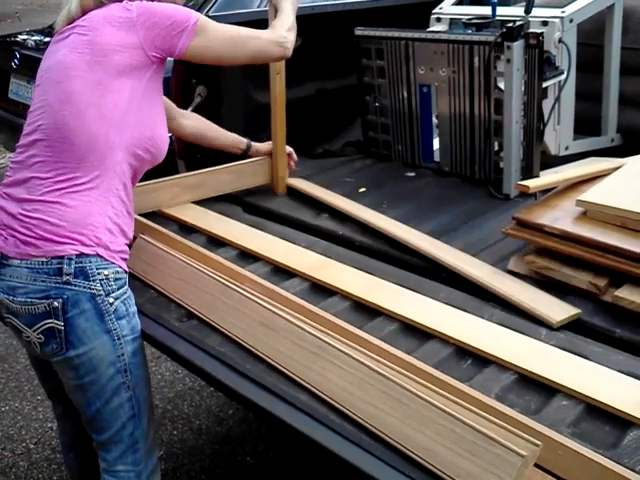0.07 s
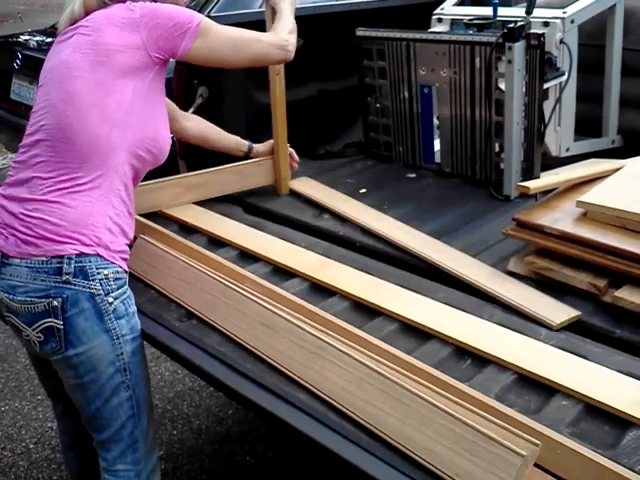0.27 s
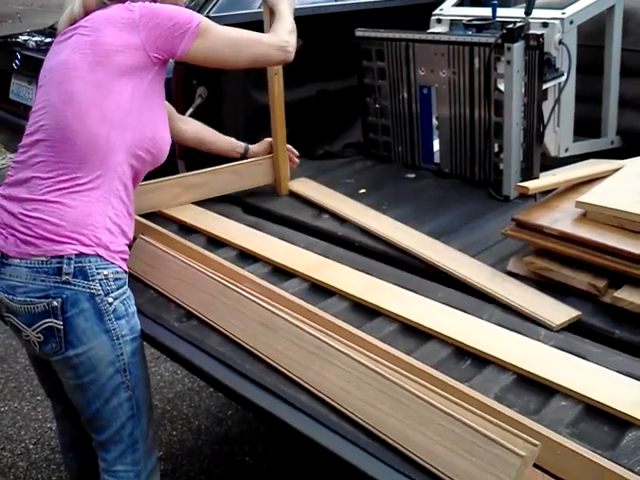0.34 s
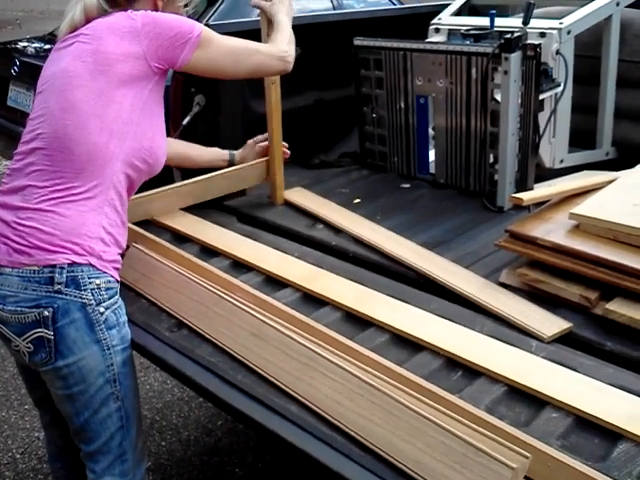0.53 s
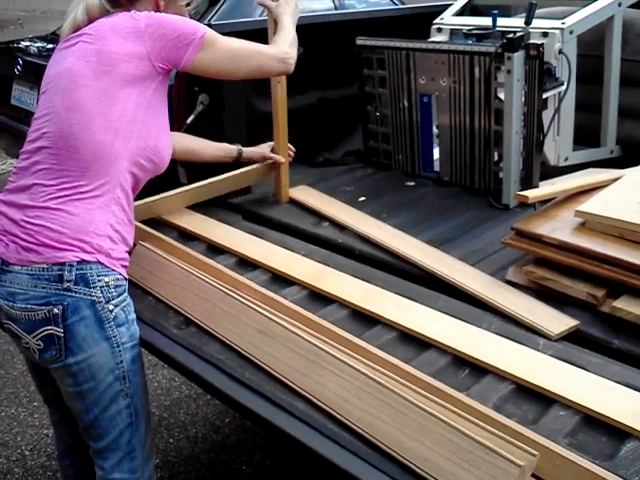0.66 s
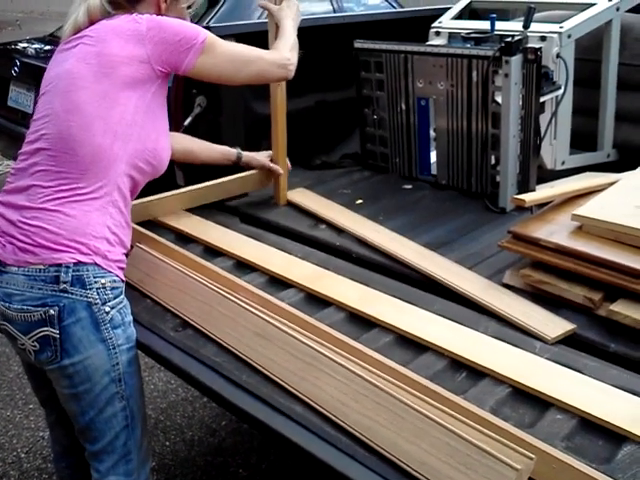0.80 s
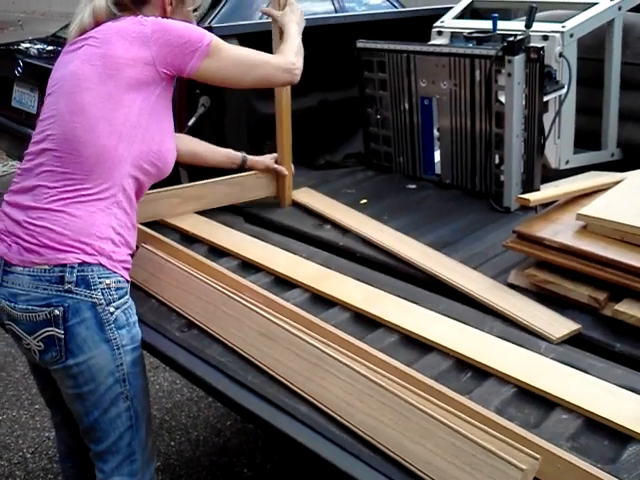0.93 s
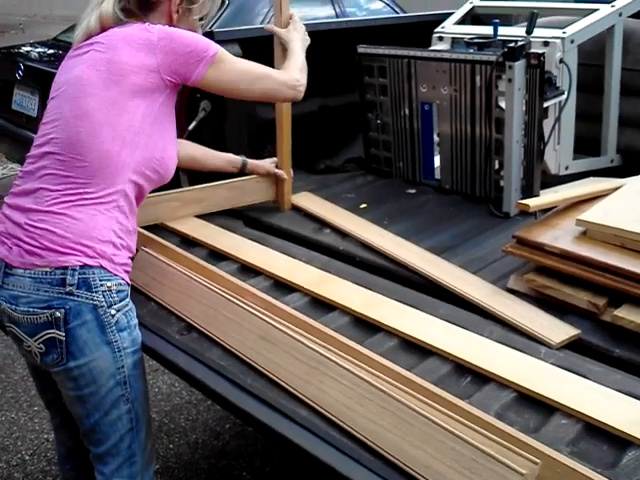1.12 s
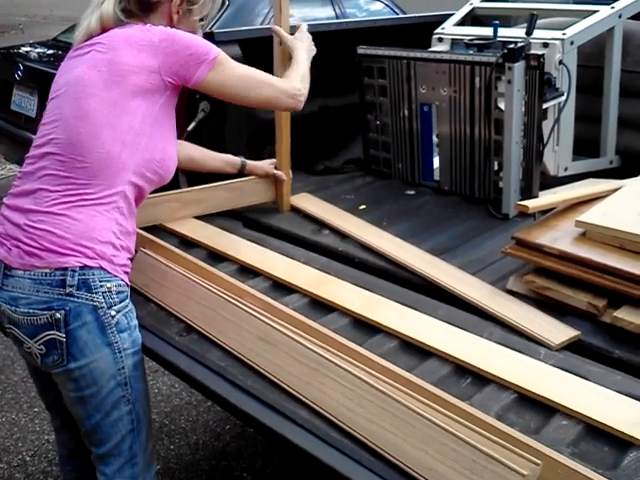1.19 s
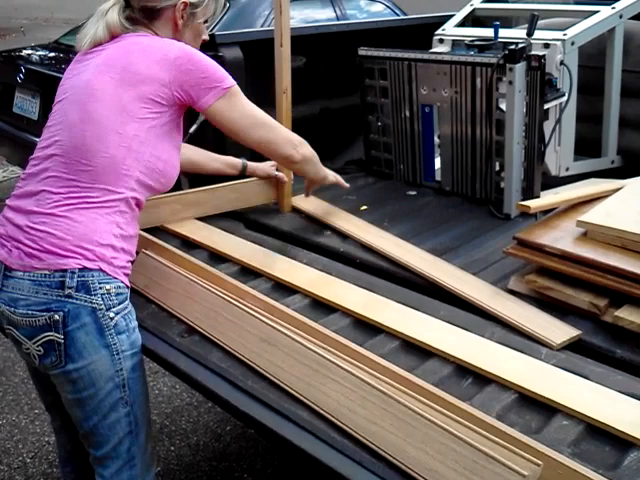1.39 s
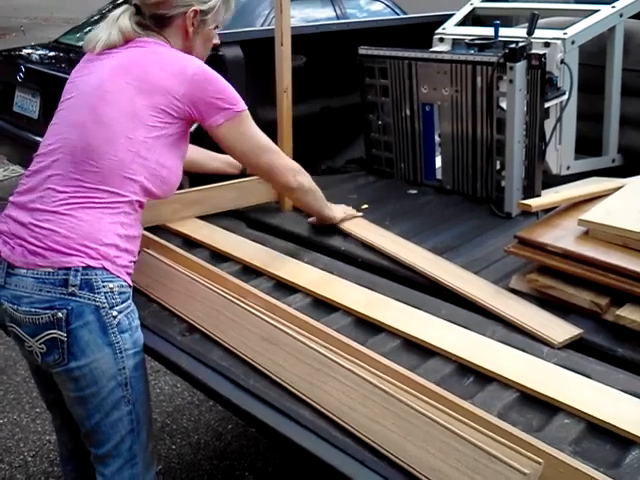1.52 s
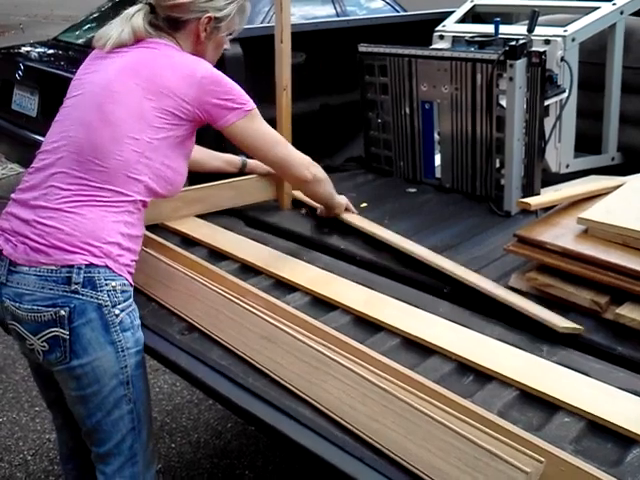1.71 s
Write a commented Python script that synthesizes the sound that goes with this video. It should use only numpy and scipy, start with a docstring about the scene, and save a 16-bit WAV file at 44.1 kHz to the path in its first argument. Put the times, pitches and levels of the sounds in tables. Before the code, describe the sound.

A wooden board falls with a loud, slightly distorted slap and rapid bouncing clatter in a hollow pickup bed, after soft bumps and scraping; lighter knocks follow, over faint outdoor rumble, close dull microphone.

```python
"""In a pickup bed outdoors, a wooden board tips over, slaps down and bounces, with lighter knocks and slides.
Each blow is a crack, the ringing of board and bed, and a faint rattle of further touches.
Ringing is made of decaying sine tones, with bands of decaying noise between them.
Sliding wood is coloured noise of uneven size; a few thin tones linger in the bed.
Distant outdoor noise lies underneath, and the loud slaps overload the input stage."""
import sys
import numpy as np
from scipy import signal
from scipy.fft import rfft, irfft
from scipy.io import wavfile
from scipy.ndimage import uniform_filter1d

SR = 44100
rng = np.random.default_rng(int(sys.argv[2]) if len(sys.argv) > 2 else 0)


def elevation(decibels):
    """Turn decibel levels (scalar or array-like) into linear amplitude ratios."""
    levels = np.asarray(decibels, float)
    return 10 ** (levels / 20)


def store_pcm(level_fs):
    """Save levels as 16-bit WAV."""
    pcm = np.round(np.clip(level_fs, -1, 1) * 32767).astype(np.int16)
    wavfile.write(sys.argv[1], SR, np.atleast_2d(pcm).T)


N = 77175  # length of the scene in samples

# In all the tables, t60 is the time a ring takes to fall by 60 dB.
# Distant outdoor noise, its balance of low and high: (frequency [Hz], relative level [dB per Hz])
OUTDOOR_COLOUR = [(12, -15), (20, -19.5), (48, -1.5), (108, -4), (149, -15.5), (248, -7), (324, -10),
                  (1140, -13), (2610, -31), (7410, -39), (12000, -103), (15600, -118), (22000, -120)]
# Loudness of the wood sliding on the bed: (time [s], level [dB])
SLIDE_LEVELS = [(0, -49), (.09, -45.5), (.17, -45), (.25, -44), (0.601, -66.5), (0.722, -45), (.9, -47),
                (.96, -49), (1.02, -42.5), (1.064, -29.5), (1.119, -44), (1.2, -51.5), (1.3, -57.5),
                (1.593, -60), (1.61, -47.5), (1.72, -49.5), (1.75, -57)]
# Sliding wood, its balance of low and high: (frequency [Hz], relative level [dB per Hz])
SLIDE_COLOUR = [(710, -21), (1200, 3.5), (4620, 0.5), (6050, -7), (7700, -8), (8650, -31.5), (9520, -63),
                (12000, -40), (15600, -103), (22000, -120)]
# Blows, with the pitches that the struck spot favours:
# (time [s], board level [dB], bed level [dB], board favoured pitch [Hz], bed favoured pitch [Hz])
BLOWS = [(.002, -41, -19.5, 1500, 200), (0.0293, -30, -24, 3000, 305), (0.0414, -30, -23.5, 735, 530),
         (.064, -36, -19.5, 1200, 282), (0.0956, -36, -27, 3000, 218), (0.113, -36, -32.5, 2600, 200),
         (0.126, -31, -22.5, 2400, 200), (0.157, -29.5, -21, 2500, 208), (0.185, -34, -44, 2600, 200),
         (0.2066, -23.5, -34, 2300, 402), (.2179, -16.5, -48, 2700, 400), (.229, -49, -36, 2200, 390),
         (0.232, -33, -25, 1200, 592), (0.253, 0.5, -6.5, 2300, 600), (0.272, -1.5, -4, 1800, 260),
         (.3032, -3, -14.5, 2200, 500), (0.3424, -4.5, -5.5, 2340, 647), (.356, -10, -15, 1400, 500),
         (0.4145, -13.5, -13, 2600, 500), (0.4225, -9, -10.5, 1750, 322), (0.4675, -14, -12.5, 2800, 500),
         (.4725, -13, -9, 1750, 450), (0.5018, -11.5, -13.5, 2800, 404), (.528, -18, -14, 2040, 500),
         (.551, -19.5, -15, 2500, 390), (0.563, -19, -21, 1750, 500), (0.7508, -31.5, -26.5, 800, 200),
         (0.7809, -24, -24, 1300, 500), (.787, -29.5, -22, 1100, 620), (0.795, -18.5, -26.5, 1200, 250),
         (0.81, -44, -27, 900, 407), (0.831, -28, -28, 1540, 600), (0.8366, -30, -27.5, 800, 250),
         (1.0629, -16.5, -26, 1530, 700), (1.066, -23, -36, 680, 680), (1.073, -24, -36, 700, 600),
         (1.098, -24, -28.5, 1700, 224), (1.135, -33, -28, 1030, 200), (1.239, -50, -37, 2500, 400),
         (1.651, -65, -39, 1000, 500), (1.662, -67, -33.5, 1010, 235)]
# Ringing tones of the board, before the cap and the shortening below:
# (frequency [Hz], relative level [dB], t60 [s])
BOARD_MODES = [(675.3, 4, 0.11), (853, -2.5, 0.11), (1079, -1.5, 0.1), (1173.4, -6.5, 0.11),
               (1277, -4, 0.082), (1403, -6, .13), (1620, 2, 0.042), (1732, 1.5, 0.1), (1981, -7.5, 0.15),
               (2097, -6, 0.084), (2292, 1.5, 0.033), (2579, -6, 0.067), (2747, -1.5, 0.033),
               (2994, -13, 0.047), (3256, -8, 0.038), (3560, -8, 0.096), (3720, -11.5, 0.06),
               (3950, -11, 0.11), (5170, -44.5, 0.023), (5560, -31, 0.025)]
# Ringing tones of the bed, before light knocks shorten them: (frequency [Hz], relative level [dB], t60 [s])
BED_MODES = [(139.4, -6.5, 0.31), (179.6, -4.5, 0.29), (236.2, 0.5, 0.13), (265, -3, 0.19),
             (365.6, -5.5, 0.13), (434, -18.5, 0.33), (496, -19.5, 0.27), (530, -5.5, 0.13),
             (551.3, -8, .2), (583.2, -6, 0.25), (779.7, -0.5, 0.095), (939, -4, 0.057),
             (1172.5, 2.5, 0.057)]
# Dense ring of the board between its tones, before light knocks shorten it:
# (band centre [Hz], relative level [dB], t60 [s])
BOARD_DENSE = [(1000, -15, .2), (1500, -17, .17), (2200, -17, .16), (3200, -16, .15), (4500, -17, .13),
               (6400, -18, .12)]
# Dense ring of the bed's panels, before light knocks shorten it:
# (band centre [Hz], relative level [dB], t60 [s])
BED_DENSE = [(44.7, -26, .3), (71, -9.5, 0.27), (130, -11, 0.26), (200, -13, 0.87), (299, -6.5, 0.23),
             (500, -5.5, 0.29), (744, -7, 0.3), (1100, -10.5, 0.45)]
# Thin tones that linger in the bed: (start [s], frequency [Hz], level [dB], t60 [s], rise [cycles])
LINGER_TONES = [(.09, 220, -25, .6, 10.), (1.12, 540, -42, 1.8, 40.), (1.10, 258, -44, 1.5, 15.),
                (1.085, 200, -31, .45, 8.)]

OUTDOORS_DB = -42
# How far the levels wander [dB], before walk() smooths them
SWELL_WALK_DB, GRIT_WALK_DB, WAVER_WALK_DB = 1.2, 1.5, 2.5
PITCH_WAVER = 0.008  # share of the pitch, also before smoothing
GRIT_SIZE_DB = 2.0  # average extra size of a grain
CRACK_HZ, CRACK_OCTAVES, CRACK_T60_S = 3200, 0.7, 0.02
# Lighter touches just after a blow: how many, the loudest possible at first, and the fade to 37 percent
RATTLE_PER_S, RATTLE_DB, RATTLE_FADE_S = 400, -14, 0.004
# Each blow rings its tones at slightly different strengths and pitches (typical spread)
SCATTER_DB, DETUNE_SHARE = 3.5, 0.005
BOARD_RISE_CYCLES, BED_RISE_CYCLES = 5.24, 2.88  # scaled by flatness in ring(); lows build up late
LONGEST_BOARD_T60_S = 0.13
LIGHT_RING = 0.83  # share of the ring time left to a light knock
FLAT_SLAP_DB = -16  # blows of this board level or more land fully flat
# Fall per octave squared away from the favoured pitch, and its limit, both before flatness eases them
SPOT_FALL_DB, SPOT_FLOOR_DB = 11.0, -20
MIC_TOP_HZ = 7970
CLIP_LEVEL, CLIP_KNEE = 0.73, 6  # a higher knee bends more sharply


def unit(x):
    """Scales a sound so that its rms (average strength) is 1."""
    return x / np.sqrt(np.mean(x ** 2))


def colour(x, table):
    """Shapes the balance of low and high by a table of (Hz, dB) points; the result has rms 1."""
    hz, db = np.array(table, float).T
    f = np.maximum(np.fft.rfftfreq(len(x), 1 / SR), 1)
    gain = elevation(np.interp(np.log(f), np.log(hz), db))
    return unit(irfft(rfft(x) * gain, len(x)))


def noise_band(noise, hz, octaves):
    """Keeps the part of a noise around one pitch, fading smoothly to both sides; rms 1."""
    f = np.fft.rfftfreq(len(noise), 1 / SR) + 1
    gain = np.exp(-(np.log2(f / hz) / octaves) ** 2)
    return unit(irfft(rfft(noise) * gain, len(noise)))


def walk(rate):
    """A wandering curve: random values held for 1 / rate seconds, then smoothed twice."""
    hold = int(SR / rate)
    steps = np.repeat(rng.standard_normal(N // hold + 1), hold)
    return uniform_filter1d(uniform_filter1d(steps, hold), hold)[:N]


def swell(t, hz, t60, cycles):
    """A ring's loudness: it builds up over some cycles of its pitch while it dies away."""
    rise = 1 - np.exp(-(t * hz / cycles) ** 2)
    return rise * np.exp(-np.log(1000) * t / t60)


def outdoors():
    """Distant traffic and air: coloured noise whose level swells a little."""
    noise = rng.standard_normal(N) * elevation(SWELL_WALK_DB * walk(1.67))
    return colour(noise, OUTDOOR_COLOUR) * elevation(OUTDOORS_DB)


def slide():
    """Fine grit under moving wood gives dense clicks of uneven size."""
    size_db = GRIT_SIZE_DB * rng.exponential(size=N) + GRIT_WALK_DB * walk(59.57)
    grit = rng.standard_normal(N) * elevation(size_db)
    s, db = np.array(SLIDE_LEVELS).T
    level_db = np.interp(np.arange(N) / SR, s, db)
    return colour(grit, SLIDE_COLOUR) * elevation(level_db)


def spot(hz, spot_hz, flat):
    """The struck spot favours one pitch: dB lost away from it, less so when the board lands flat."""
    loss_db = max(-SPOT_FALL_DB * np.log2(hz / spot_hz) ** 2, SPOT_FLOOR_DB)
    return (1 - 0.57 * flat ** 2) * loss_db


def crack(spot_hz, flat, t):
    """The sharp contact of a blow: a short burst of bright noise."""
    noise = noise_band(rng.standard_normal(len(t)), CRACK_HZ, CRACK_OCTAVES)
    return elevation(spot(CRACK_HZ, spot_hz, flat)) * noise * swell(t, CRACK_HZ, CRACK_T60_S, 1)


def ring(modes, dense, cycles, spot_hz, flat, t):
    """A struck body answers with its own decaying tones and with noise bands between them."""
    out = np.zeros(len(t))
    cycles = cycles * (0.24 + 0.8 * flat)
    time_share = LIGHT_RING + (1 - LIGHT_RING) * flat
    for hz, db, t60 in modes:
        strength, detune, phase = rng.standard_normal(3)
        level_db = db + spot(hz, spot_hz, flat) + SCATTER_DB * strength
        tone = np.sin(2 * np.pi * (hz * (1 + DETUNE_SHARE * detune) * t + phase))
        out += elevation(level_db) * swell(t, hz, t60 * time_share, cycles) * tone
    noise = rng.standard_normal(len(t))  # all the bands share it
    for hz, db, t60 in dense:
        level_db = db + spot(hz, spot_hz, flat)
        out += elevation(level_db) * swell(t, hz, t60 * time_share, cycles) * noise_band(noise, hz, 0.48)
    return out


def touches():
    """The moments of contact in one blow: the main hit, then a fading rattle of random touches."""
    t = np.arange(1024) / SR
    happens = rng.random(len(t)) < RATTLE_PER_S / SR
    size = rng.uniform(-1, 1, len(t)) * elevation(RATTLE_DB)
    contact = happens * size * np.exp(-t / RATTLE_FADE_S)
    contact[0] = 1
    return contact


def blows():
    """Every touch of a blow sets off the same crack and the same ringing of board and bed."""
    out = np.zeros(N + SR)  # spare room for the last rings
    t = np.arange(12288) / SR
    board = [(hz, db, min(t60, LONGEST_BOARD_T60_S)) for hz, db, t60 in BOARD_MODES]
    for s, board_db, bed_db, board_hz, bed_hz in BLOWS:
        # 1 for a flat slap, 0 for a light knock; flat slaps sound broader and their lows come later
        flat = np.clip(2 - board_db / FLAT_SLAP_DB, 0, 1) ** 0.5
        board_ring = ring(board, BOARD_DENSE, BOARD_RISE_CYCLES, board_hz, flat, t)
        bed_ring = ring(BED_MODES, BED_DENSE, BED_RISE_CYCLES, bed_hz, flat, t)
        body = elevation(board_db) * (crack(board_hz, flat, t) + board_ring) + elevation(bed_db) * bed_ring
        blow = signal.fftconvolve(touches(), body)
        i = int(s * SR)
        out[i:i + len(blow)] += blow
    return out[:N]


def linger():
    """Thin tones that die away slowly in the bed, wavering slightly in level and pitch."""
    t = np.arange(N) / SR
    out = np.zeros(N)
    for s, hz, db, t60, cycles in LINGER_TONES:
        level = elevation(db + WAVER_WALK_DB * walk(28))
        turns = hz * np.cumsum(1 + PITCH_WAVER * walk(10)) / SR
        since_start = np.maximum(t - s, 0)
        out += level * np.sin(2 * np.pi * turns) * swell(since_start, hz, t60, cycles)
    return out


def scene():
    """Adds all the sounds together as one channel."""
    return (outdoors() + slide() + blows() + linger())[None]


def roll_off(x):
    """The treble ends steeply here."""
    return signal.sosfilt(signal.butter(12, 16270, fs=SR, output="sos"), x)


def record(dry):
    """The microphone loses the highest sounds, and its input stage flattens loud peaks."""
    low_pass = signal.butter(8, MIC_TOP_HZ, fs=SR, output="sos")
    mic = signal.sosfilt(low_pass, dry)
    # quiet sound is turned down slightly by the 2.5; loud sound cannot pass CLIP_LEVEL
    mix = mic / (2.5 + (mic / CLIP_LEVEL) ** CLIP_KNEE) ** (1 / CLIP_KNEE)
    return roll_off(mix)


dry = scene()
out = record(dry)
store_pcm(out)
```